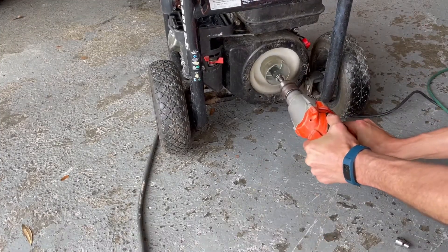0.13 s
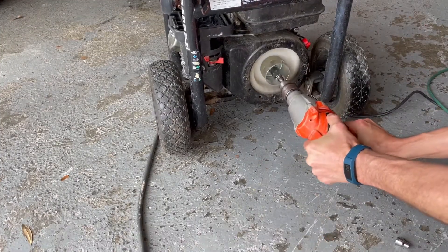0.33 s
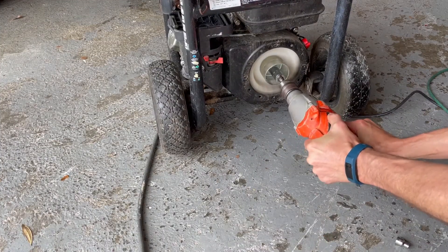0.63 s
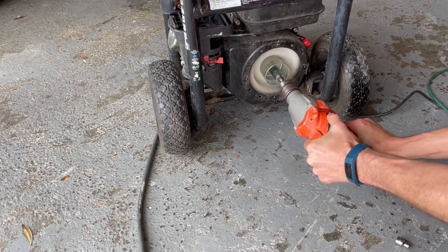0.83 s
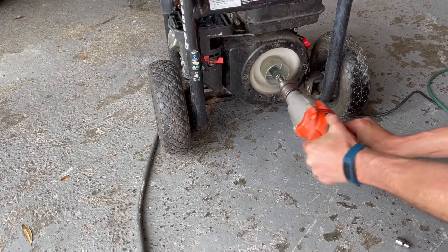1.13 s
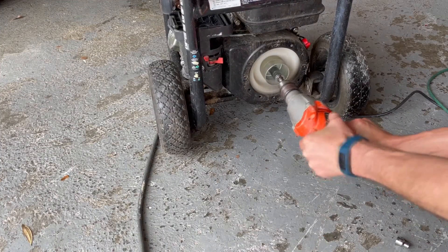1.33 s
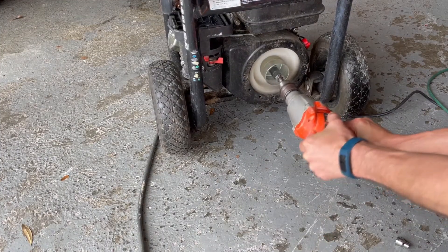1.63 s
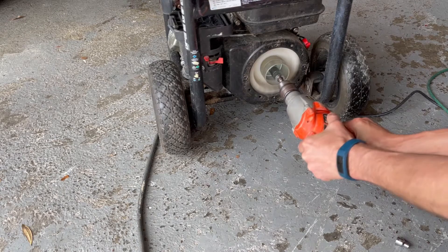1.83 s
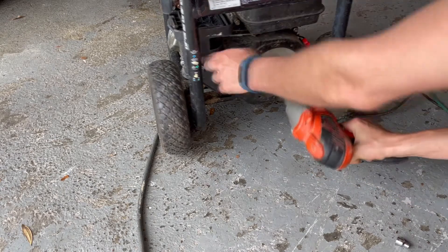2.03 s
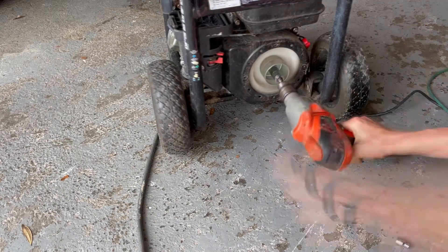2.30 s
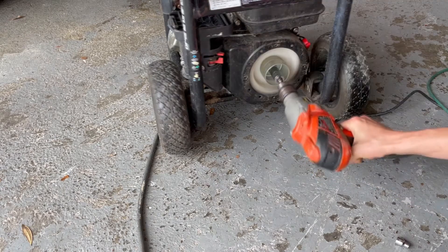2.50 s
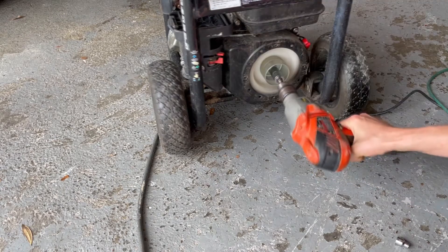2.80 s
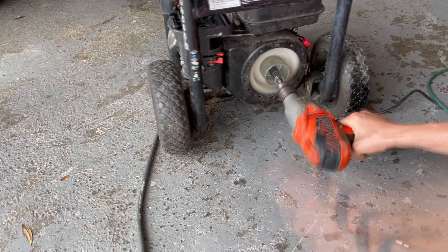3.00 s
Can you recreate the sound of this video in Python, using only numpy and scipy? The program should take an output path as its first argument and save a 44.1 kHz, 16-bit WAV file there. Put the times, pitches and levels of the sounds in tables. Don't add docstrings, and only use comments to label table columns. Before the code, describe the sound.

Electric drill whine with rushing fan hiss, heard about a metre away on a phone with a short hard-floor reflection. Slow compression thumps drag its pitch at first; after one second the sound suddenly softens and runs evenly.

```python
import sys
import numpy as np
from scipy import signal
from scipy.fft import rfft, irfft
from scipy.io import wavfile
from scipy.ndimage import uniform_filter1d

SR = 44100
rng = np.random.default_rng(int(sys.argv[2]) if len(sys.argv) > 2 else 0)


def put_to_file(sound):
    columns = np.atleast_2d(sound).T
    safe = np.clip(columns, -1, 1)
    whole_steps = np.round(safe * 32767)
    wavfile.write(sys.argv[1], SR, whole_steps.astype(np.int16))


def volts(x):
    e = np.asarray(x, float) / 20
    return 10 ** e


N = 138915
TIME = np.arange(N) / SR
FREQ = np.fft.rfftfreq(N, 1 / SR) + 1e-3

# pitch_hz, level_db
HUM = [(38, -58), (75.5, -63.5)]
# pitch_hz, level_db (per Hz)
HISS_COLOUR = [(25, -24), (55, -8.5), (260, -11.5), (700, -8.5), (2300, -5.5), (6500, -8), (12000, -8),
               (16000, -13.5)]
# pitch_hz, gain_db
EVEN_HISS_TILT = [(60, 5.5), (250, 2.5), (1000, 1.5), (3000, 0.5), (9000, 0.5), (16000, -2)]
# pitch_hz, width_hz, lift_db
HOUSING_RESONANCES = [(103, 12, -5), (375, 30, 3.5), (510, 45, 1.5), (830, 126, 1), (1237, 195, 4),
                      (1850, 320, 0.5), (3183, 165, 6), (3580, 80, 5.5), (4450, 205, 3), (5240, 150, 5),
                      (5600, 235, -2.5), (8100, 370, 4), (9470, 500, 6.5), (12900, 600, 2)]
# place_cycles (0-1), width_cycles, gain_db
HISS_SWELLS = [(.02, 0.023, 2.5), (.18, 0.055, -3.5), (.31, .02, 1.5), (.7, 0.037, 3)]
# start_s (centre), gain_db, length_s
CLATTER = [(.2, 5, 0.0095), (0.328, 1, 0.0077), (0.458, 2.5, .008), (.735, 2, .01), (0.866, 0.5, .012),
           (0.917, 4, 0.0075), (1.035, 1.5, .012), (1.078, 2.5, 0.0064), (1.49, 2, 0.011)]
# start_s, pitch_hz, t60_s, level_db
FRAME_RINGS = [
    (.005, 365, .25, -43),
    (.035, 368, .2, -43),
    (.19, 360, .15, -45),
    (.53, 60, .12, -47),
    (1.14, 68, .15, -44),
    (1.765, 66, .15, -43),
    (1.85, 45, .25, -45),
]
COMPRESSIONS = [-0.17, .018, .201, .381, .559, .737, .914, 1.091]
# delay_s (after compression), pitch_hz, t60_s, level_db, glide_share
THUMPS = [
    (-.003, 172, 0.066, -33.5, 0.047),
    (.027, 182, 0.087, -41.5, 0),
    (.058, 125, 0.046, -32, 0.7),
]
# start_s, pitch_hz (gear mesh), level_db
MOTOR = [(0, 2950, -41), (.07, 3040, -43), (.2, 3115, -35.5), (.35, 3160, -41), (.55, 3185, -42),
         (.8, 3185, -46.5), (1.05, 3198, -46.5), (1.2, 3185, -47.5), (1.5, 3188, -46.5), (1.85, 3162, -49),
         (1.97, 3158, -40), (2.15, 3182, -43), (2.3, 3205, -42.5), (2.7, 3200, -38.5), (3.15, 3200, -41.5)]
# pitch_ratio (to the mesh), level_db, wander_hz
PARTIALS = [(.113, -60.5, 4.1), (.125, -60, 6), (.164, -63, 10), (.25, -59, 12.2), (.622, -55.5, 14.5),
            (1.337, -57, 25.1), (1.61, -53, 35), (2, -51, 40.8), (3.86, -52, 40), (4, -51.5, 40.7)]
SPEED_SAGS = [
    (.11, .05, .055),
    (.36, .025, .03),
    (.75, .03, .02),
]
# place_cycles (0-1), width_cycles, gain_db
WHINE_DIPS = [(.14, 0.068, -5.5), (.92, .06, -4)]
# place_cycles (0-1), width_cycles, gain_db
WHISTLE_BURSTS = [(.965, .033, 20), (.05, .03, 19), (.305, .021, 22), (.5, .025, 13), (.69, .033, 21)]
# pitch_hz, left_lead_rad
PORT_PHASE = [(0, 0), (1500, -.5), (3400, .4), (5000, .5), (6900, -2.0), (8200, -2.6), (8700, -3.14),
              (9500, -3.75), (13200, -6.2), (16500, -6.3)]
# pitch_hz, level_db (against direct)
REFLECTED = [(60, -12), (250, -11), (700, 0), (2400, -8.5), (4000, -6), (7300, 1), (8650, -15), (10300, -6)]
# pitch_hz, left_minus_right_db
PORT_BALANCE = [(30, 1), (130, 3.5), (500, 0.5), (1300, 0.1), (2400, 1), (8000, -.5), (15000, 0)]

DROP_S, DROP_DB, DROP_FADE_S = 1.089, -6, 0.003
STROKE_HZ, STROKE_START_S, STROKE_PHASE_S = 22.63, 1.176, 1.16
STROKE_RING_HZ, STROKE_T60_S, STROKE_DB, STROKE_LOW_DB = 182, 0.12, -47, -57
STROKE_WOBBLE_SHARE, STROKE_THROB_DB, SPEED_LAG_S = .008, 3.6, .007
HISS_DB = -34
WHINE_WANDER_HZ = 17
SECOND_GEAR_RATIO, SECOND_GEAR_DB, SECOND_GEAR_EVEN_DB = .4145, -51, -54
WHISTLE_WANDER_HZ, WHISTLE_DB, WHISTLE_EVEN_DB, WHISTLE_FADE_DB_S = 40, -48.5, -40, -1.5
ECHO_T60_S = 0.11
TOP_HZ = 15850


def column(table, x, axis=1):
    return np.interp(x, np.array(table)[:, 0], np.array(table)[:, axis])


def colour(table):
    hz, db = np.transpose(table)
    return np.interp(np.log(FREQ), np.log(hz), db)


def unit(x):
    return x / np.sqrt(np.mean(x ** 2))


def bell(x, centre, width):
    return np.exp(-.5 * ((x - centre) / width) ** 2)


def walk(rate_hz, times=TIME):
    steps = uniform_filter1d(np.repeat(rng.standard_normal(1200), 4), 5)
    return 1.2 * np.interp(times * rate_hz * 8, np.arange(4800), steps)


def bumps(cycle, table):
    total = 0
    for place, width, size in table:
        distance = (cycle - place + .5) % 1 - .5
        total = total + size * bell(distance, 0, width)
    return total


def swept_sine(hz):
    return np.sin(2 * np.pi * np.cumsum(hz) / SR)


def tone(hz, wander_hz, flutter_db, rate_hz=60.):
    wandering = swept_sine(hz + wander_hz * walk(rate_hz))
    return wandering * volts(flutter_db * walk(rate_hz / 2)) * 2 ** .5


def add_ring(out, start, hz, t60, db, glide=0.):
    first = int(start * SR) + 1
    place = slice(first, first + 9000)
    t = TIME[place] - start
    fall = np.where(t < .02, t ** 2 / 0.037, t - .01)
    envelope = volts(db - 60 * t / t60) * (1 - np.exp(-t / .002))
    out[place] += envelope * np.sin(2 * np.pi * hz * (t - glide * fall))


def hum():
    return sum(volts(db + 2.2 * walk(6)) * swept_sine(hz + 1.5 * walk(4)) for hz, db in HUM)


def frame_knocks():
    out = np.zeros(N)
    for knock in FRAME_RINGS:
        add_ring(out, *knock)
    return out


def fan_hiss(cycle, slow):
    housing_db = sum(lift * bell(FREQ, hz, width) for hz, width, lift in HOUSING_RESONANCES)
    spectrum = rfft(rng.standard_normal((3, N)), axis=1) * volts(colour(HISS_COLOUR) + housing_db)
    even_air = irfft(spectrum * volts(colour(EVEN_HISS_TILT)), N)
    air = slow * irfft(spectrum, N) + (1 - slow) * even_air
    hz, t, cells = signal.stft(air, SR, nperseg=256)
    load_db = np.interp(t, TIME, slow * bumps(cycle, HISS_SWELLS)) + .6 * walk(18, t)
    flicker = np.array([walk(15, t) for _ in range(17)])[np.arange(len(hz)) // 8]
    cells = cells * volts(np.clip(hz / 3000, 0, 1.3)[:, None] * load_db + 0.72 * flicker)
    clatter_db = sum(db * bell(t, start, length) for start, db, length in CLATTER)
    clatter_band = bell(np.log((hz + 1) / 1900), 0, 0.85)
    cells = cells * volts(clatter_band[:, None] * clatter_db)
    return volts(HISS_DB) * unit(signal.istft(cells, SR, nperseg=256)[1][:, :N])


def compression_thumps():
    out = np.zeros(N)
    for start in COMPRESSIONS[1:-1]:
        for (delay, hz, t60, db, glide), sign in zip(THUMPS, (-1, 1, 1)):
            level = db + 1.2 * rng.standard_normal()
            add_ring(out, start + delay, sign * hz, t60, level, glide)
    return out


def even_strokes():
    out = np.zeros(N)
    for k, (ring_chance, low_chance, time_chance) in enumerate(rng.standard_normal((47, 3))):
        start = STROKE_START_S + (k - 2) / STROKE_HZ + 0.00036 * time_chance
        add_ring(out, start, STROKE_RING_HZ, STROKE_T60_S, STROKE_DB + 0.96 * ring_chance)
        add_ring(out, start, 70, .07, STROKE_LOW_DB + 4 * low_chance)
    return out


def commutator_whistle(dragged, cycle, slow):
    even = 1 - slow
    slow_db = WHISTLE_DB + 3 * np.exp(-TIME / .25) + bumps(cycle, WHISTLE_BURSTS) + 1.2 * walk(8.3)
    even_db = WHISTLE_EVEN_DB + WHISTLE_FADE_DB_S * (TIME - DROP_S)
    whistle = tone(3 * dragged, WHISTLE_WANDER_HZ * (1 + 1.2 * even), 1.6 + 3 * even, rate_hz=140.)
    return volts(slow * slow_db + even * even_db) * whistle


def gear_whine(mesh, dragged, cycle, slow, stroke):
    even = 1 - slow
    whine_db = column(MOTOR, TIME, axis=2)
    dips_db = slow * bumps(cycle, WHINE_DIPS) + even * STROKE_THROB_DB * stroke
    whine_hz = mesh - 0.199 * slow * (mesh - dragged)
    out = volts(whine_db + dips_db) * tone(whine_hz, WHINE_WANDER_HZ * (0.695 + 0.31 * even), 2.6)
    for ratio, db, wander in PARTIALS:
        out = out + volts(db + slow * dips_db) * tone(mesh * ratio, wander, 3.54, rate_hz=100.)
    out = out + even * volts(whine_db - 6.5) * tone(mesh * .972, 34.9, 3.8, rate_hz=90.)
    slow_gear_db = SECOND_GEAR_DB + 1.2 * bumps(cycle, HISS_SWELLS)
    gear_db = slow * slow_gear_db + even * SECOND_GEAR_EVEN_DB
    return out + volts(gear_db) * tone(mesh * SECOND_GEAR_RATIO, 13.95, 4.2)


def drill(cycle, slow, stroke):
    speed = column(MOTOR, TIME)
    lagged_stroke = np.roll(stroke, int(SPEED_LAG_S * SR))
    mesh = speed * (1 + (1 - slow) * STROKE_WOBBLE_SHARE * lagged_stroke)
    dragged = speed * (1 - slow * bumps(cycle, SPEED_SAGS))
    return gear_whine(mesh, dragged, cycle, slow, stroke) + commutator_whistle(dragged, cycle, slow)


def two_ports(solid, air):
    tail = rng.standard_normal((2, N)) * volts(-60 * TIME / ECHO_T60_S)
    echo = rfft(tail / np.sqrt(np.sum(tail ** 2, axis=1, keepdims=True)), axis=1)
    solid, air = rfft(solid), rfft(air)
    side = np.array([[.5], [-.5]])
    wet = volts(colour(REFLECTED))
    direct = (solid + air[0]) * np.exp(1j * side * column(PORT_PHASE, FREQ))
    reflected = wet * (volts(-2.5) * solid * echo + air[1:])
    balance = volts(side * colour(PORT_BALANCE)) / np.sqrt(1 + wet ** 2)
    return irfft((direct + reflected) * balance, N, axis=1)


def scene():
    cycle = np.interp(TIME, COMPRESSIONS, np.arange(len(COMPRESSIONS)))
    slow = np.clip((DROP_S - TIME) / DROP_FADE_S + .5, 0, 1)
    stroke = np.sin(2 * np.pi * STROKE_HZ * (TIME - STROKE_PHASE_S))
    drop = volts(DROP_DB * (1 - slow))
    air = drop * fan_hiss(cycle, slow)
    engine = hum() + frame_knocks() + compression_thumps() + even_strokes()
    return two_ports(engine + drop * drill(cycle, slow, stroke), air)


def band_limit(x):
    return signal.sosfilt(signal.butter(12, 16100, fs=SR, output="sos"), x)


def record(dry):
    mix = irfft(rfft(dry) * (FREQ < TOP_HZ), N)
    return band_limit(mix)


dry = scene()
out = record(dry)
put_to_file(out)
```